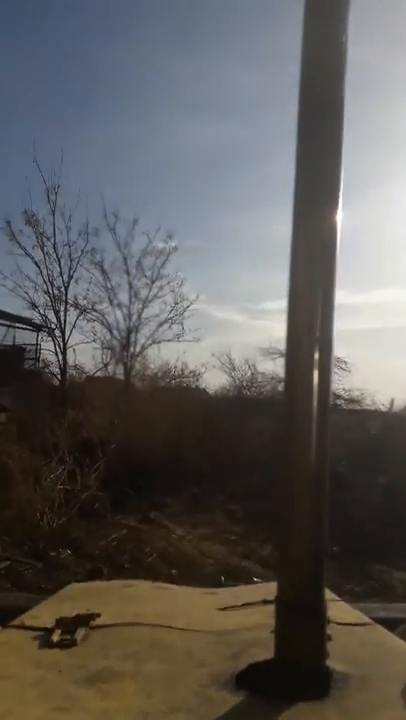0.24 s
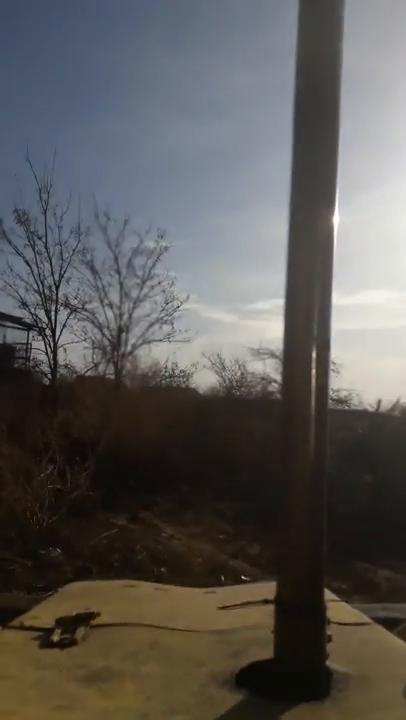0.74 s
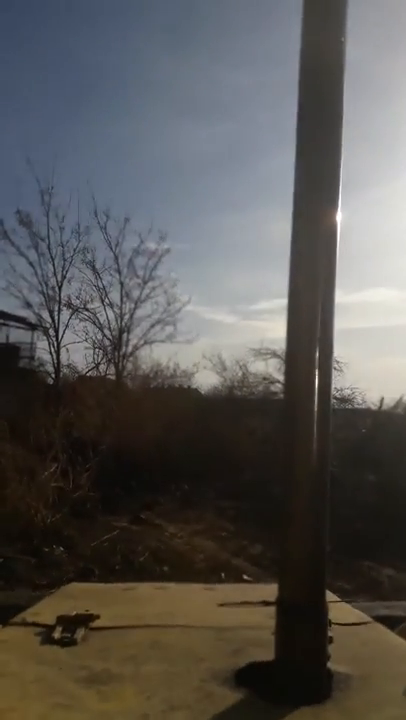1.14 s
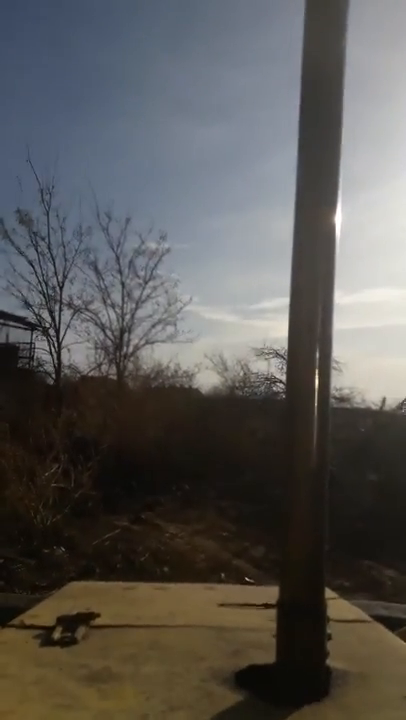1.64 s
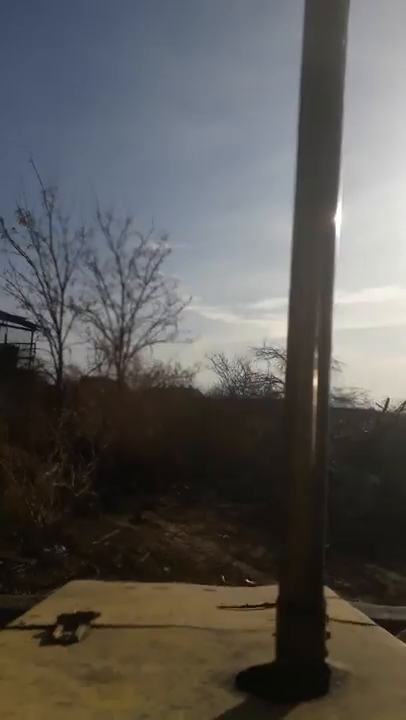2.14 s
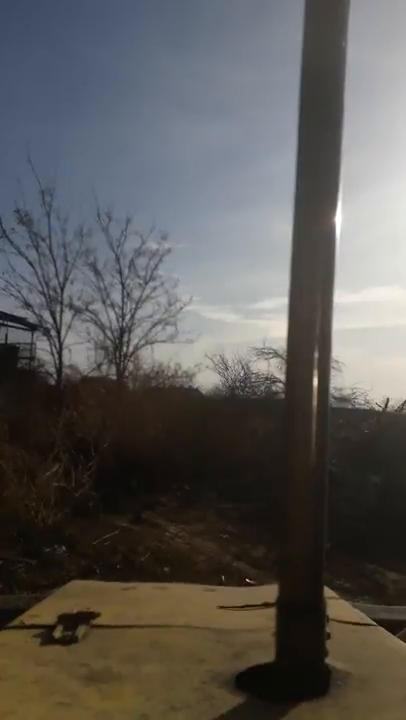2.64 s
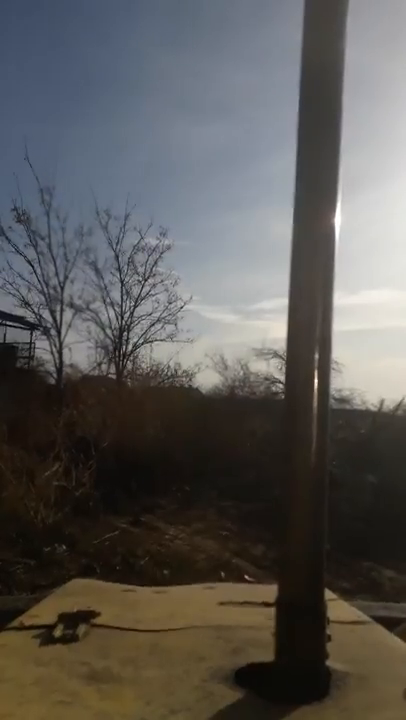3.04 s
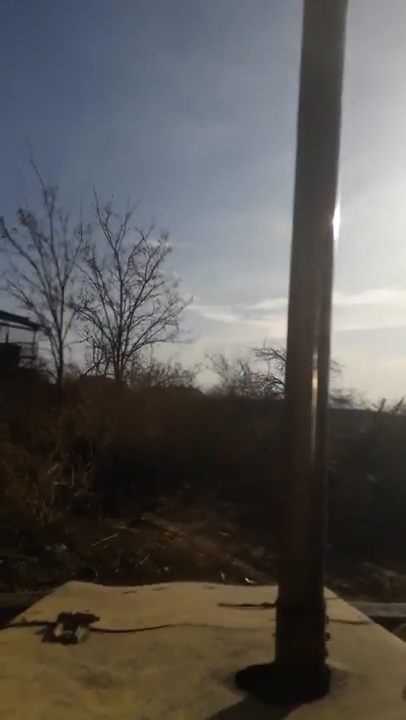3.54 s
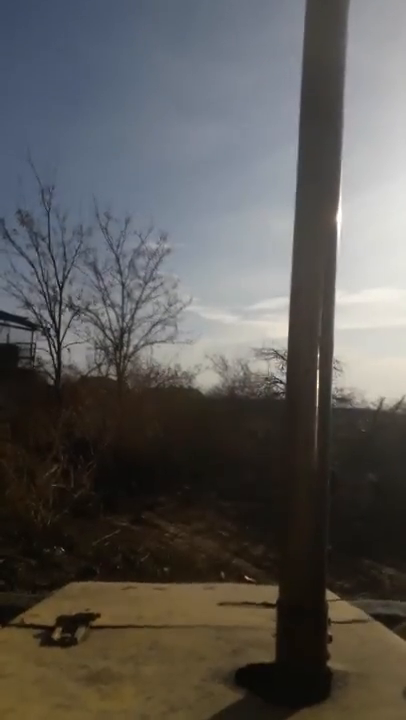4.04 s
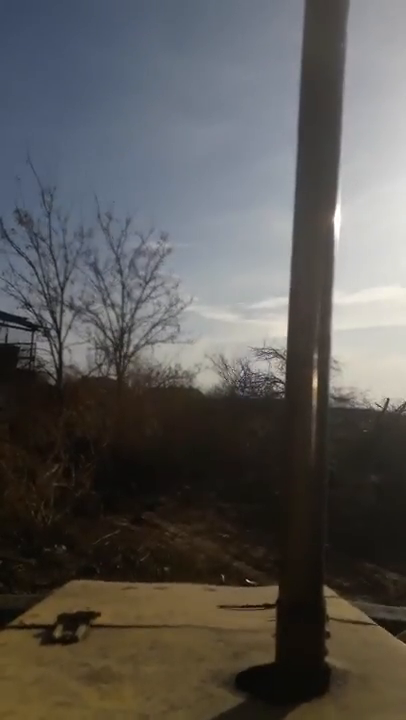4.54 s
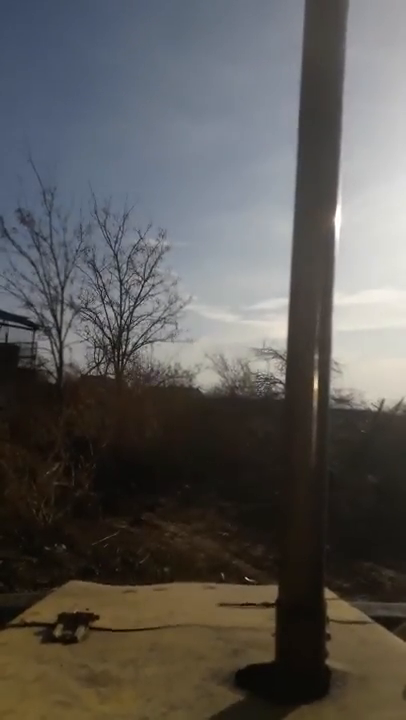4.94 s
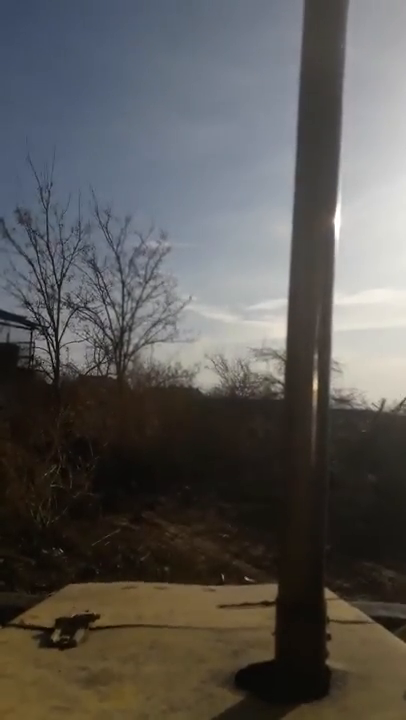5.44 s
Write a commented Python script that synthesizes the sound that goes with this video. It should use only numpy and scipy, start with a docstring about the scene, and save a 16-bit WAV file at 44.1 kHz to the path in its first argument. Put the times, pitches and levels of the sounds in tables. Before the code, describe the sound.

A four-cylinder diesel idles outdoors, heard from just behind the bonnet, throbbing and barking through its tall exhaust stack. A fan hums, loose panels buzz and thump, and a dry pulley squeaks twice at the start. Midway a lever groans, clicks and clanks home in a quick metallic cluster. The whole sound ducks for about a second, then the engine comes back, slightly lower and smoother.

```python
"""Diesel idling under a tall stack

Outdoors, microphone just behind the bonnet. Four cylinders throb, bark and clatter in every cycle;
a fan hums, a dry pulley squeaks and the shaken bodywork buzzes and thumps. A lever groans, clicks
and clanks home, loading the engine, which then runs a little slower and throbs less.
The clanks make the gain control duck for a second."""
import sys
import numpy as np
from scipy import signal
from scipy.fft import rfft, irfft
from scipy.io import wavfile
from scipy.ndimage import uniform_filter1d, minimum_filter1d

SR = 44100
rng = np.random.default_rng(int(sys.argv[2]) if len(sys.argv) > 2 else 0)


def unload_wav(signal):
    """Save mono or channel-first audio to the path in sys.argv[1] as 16-bit WAV at rate SR, clipped to [-1, 1]."""
    wavfile.write(
        sys.argv[1],
        SR,
        np.round(np.clip(np.atleast_2d(signal).T, -1, 1) * 32767).astype(np.int16),
    )


N = 250488
T = np.arange(N) / SR
LOAD_SPAN_S = (3.1, 3.4)  # the lever brings the load on between these times
FIRING_HZ = (23.929, 23.80)  # free, loaded
START_DB, STEADY_DB = -1, 1.9  # the engine's effort at first and once it has come up

# the cylinders in firing order: (rumble [dB], bark [dB], clatter [dB])
CYLINDERS = [(0.5, 6.5, 1), (-1.5, -2.5, -1), (-12.5, -7, 0), (-1.5, 5.5, -2)]
# exhaust stack resonances: (centre [Hz], width [Hz], free level [dB], loaded level [dB])
STACK_RESONANCES = [(71.8, 11, -24, -24.2), (119.3, 6, -42, -35), (152, 27, -26.8, -26)]
# body resonances that swell once a cycle:
# (centre [Hz], width [Hz], lag after the strongest firing [cycles], free level [dB], loaded level [dB])
BODY_THROBS = [(97.87, 10.3, 0.023, -22, -28.5), (188, 13, 0.062, -30.5, -48),
               (270.8, 15, 0.94, -32.5, -33.5)]
# pipe tones: (pitch [Hz], first swell [cycles], free level [dB], loaded level [dB], each cylinder [dB])
PIPE_HUMS = [(185, 0.93, -29.5, -36, (-1.2, 0.094, 0.5, -0.5)), (239, 0.0085, -29, -23, (2.5, -1, -7.5, 1)),
             (525, 0.017, -33, -28.5, (-2.5, -1.5, -5, 4.5))]
# spectrum of the shaken bodywork: (frequency [Hz], level [dB])
RUMBLE_COLOUR = [(25, -42), (60, -18.5), (85, -17.5), (104, 1.5), (150, -17.5), (195, -2), (250, -5.5),
                 (310, -6.5), (370, -8.5), (400, -11), (440, -4.5), (480, -8), (535, -3), (600, -14.5),
                 (900, -34.5), (2000, -54)]
# spectrum of the exhaust bark: (frequency [Hz], level [dB])
BARK_COLOUR = [(200, 1.5), (500, 1), (720, 2), (850, 1.5), (958, 4.5), (1060, 2), (1250, -4.5), (1400, -4),
               (1700, -18), (3000, -27.5), (8000, -44.5)]
# spectrum of injectors and valves: (frequency [Hz], level [dB])
CLATTER_COLOUR = [(500, -9), (1300, 9.5), (2100, 6), (3000, -0.5), (4100, -4), (5300, -10.5), (6000, -12.5),
                  (7200, -19), (9500, -27), (11500, -13.5), (15500, -23)]
# spectrum of the loose valve: (frequency [Hz], level [dB])
TAPPET_COLOUR = [(1500, -41.5), (3000, 3.5), (3500, -6), (3910, 6.5), (4500, -4.5), (5260, -0.5),
                 (5800, -14.5), (7200, -12.5), (9000, -27.5)]
# the lever's knocks: (time [s], snap [dB], crack [dB], boom [dB], position [0 catch to 1 end stop])
LEVER_KNOCKS = [(2.835, -22.5, -19, -29, 0.77), (3.069, -31, -9, -16, 0.015),
                (3.0734, -26.5, -11, -5.5, 0.16), (3.114, -31, -17.5, -7, 0.44),
                (3.145, -31, -23.5, -21, 0.25), (3.178, -27, -25, -28, 0.92), (3.1856, -12, -8.5, -9, 0.66),
                (3.193, -21.5, -4.5, -5, 0.76), (3.253, -30, -13, -8.5, 0.45),
                (3.303, -48, -31.5, -11, 0.34), (3.858, -31, -36, -48, 0.65), (3.878, -27, -25, -31, 0.73),
                (3.986, -32, -31, -23, .5), (5.225, -31.5, -27, -17, 0.72)]
# ring of lever and linkage: (pitch [Hz], level at the catch [dB], level at the end stop [dB], t60 [s])
LEVER_MODES = [(346.6, -5.5, -7, 0.53), (382, -2, -4, 0.36), (904, 5.5, -8.5, 0.24), (1200, -2, -1.5, 0.14),
               (1230, 11, -6.5, 0.039), (1294, -3, -11.5, 0.23), (1360, -12.5, -8, 0.16),
               (2020, -13.5, -13.5, 0.14), (2050, -3, 0.5, 0.04), (2283, -7, -8.5, 0.15),
               (2637, -16, 0.5, 0.09), (2840, -16, 0, 0.085), (3360, -22, -1, 0.07),
               (4296, -17.5, -14.5, 0.12), (4700, -1.5, -23, 0.089), (4890, -14, -5.5, .065),
               (5134, -12.5, -14.5, 0.11), (5420, -18, -9, .08), (5850, -14, -20, 0.1),
               (6270, -21.5, -11.5, 0.11)]
# ring of the catch, freed by the first knock: (pitch [Hz], level [dB], t60 [s])
CATCH_MODES = [(1972, -28.5, 0.33), (2520, -34, .2), (3410, -29, 0.17), (8300, -37, .19)]
# spectrum of steel on steel: (frequency [Hz], level at the catch [dB], level at the end stop [dB])
CRACK_COLOUR = [(300, -10.5, -10), (800, -0.5, -4), (1200, 4, 0.5), (1700, 0.5, 0.5), (2200, 0.5, 2.5),
                (2900, -8, 1), (3500, -12.5, -2.5), (3900, -6.5, -7), (4700, -7, -5.5), (5530, -13, -7),
                (6500, -18, -11.5), (9200, -18.5, -14.5), (12500, -16.5, -14), (15500, -27.5, -23.5)]
# spectrum of the panels around the lever: (frequency [Hz], level [dB])
BOOM_COLOUR = [(40, -34), (100, -22), (170, -6.5), (250, -3.5), (380, -3), (500, -4.5), (650, -11),
               (950, -12), (1400, -15.5), (2500, -30), (8000, -50)]
# spectrum of the rubbing linkage: (frequency [Hz], level [dB])
GROAN_COLOUR = [(150, -24), (280, 3.5), (360, 10), (470, -4), (620, -4.5), (780, -4), (1000, -22.5),
                (2000, -30.5), (6000, -45)]
# dull jolts of the bodywork: (time [s], level [dB])
BODY_THUDS = [(1.623, -9.5), (2.544, -18.5), (2.679, -16), (2.787, -11), (4.574, -18)]
# spectrum of a jolt: (frequency [Hz], level [dB])
THUD_COLOUR = [(100, -20), (250, -1.5), (430, -1), (600, -6.5), (780, -10), (1100, -17.5), (1600, -24.5),
               (4000, -45)]
# thumping panels: (time [s], pitch [Hz], level [dB])
PANEL_THUMPS = [(0.407, 186, -5.5), (0.785, 250, -8.5), (1.029, 183, -3), (1.47, 256, -5), (1.626, 428, 0),
                (1.634, 750, -14), (1.627, 252, -3.5), (2.174, 172, -12), (2.174, 256, -13),
                (2.686, 368, 0), (2.792, 353, -5), (3.04, 185, -9.5), (3.081, 384, 3), (3.13, 254, -5),
                (3.205, 264, 6.5), (3.297, 380, -1), (4.577, 235, 0), (4.687, 92.3, -6.5),
                (5.227, 237, -1.5)]
# small loose parts: (time [s], pitch [Hz], level [dB])
PART_CLINKS = [(.057, 8060, -29), (0.312, 4580, -37), (1.222, 7620, -39), (5.225, 3140, -19.5)]
# buzzing panels and brackets:
# (pitch [Hz], centre [cycles], half length [cycles], free level [dB], loaded level [dB])
PANEL_BUZZES = [(252.2, 0.06, 0.042, -29.5, -34), (251.7, .77, .06, -31.5, -33),
                (444, .55, 0.06, -39.5, -44), (535, 0.793, 0.08, -35, -36), (761, 0.13, 0.45, -41.5, -43.5),
                (888, 0.67, 0.063, -49, -55), (963, .92, 0.13, -54.5, -48.5),
                (1175, 0.035, 0.075, -48, -48)]
# the dry pulley: (time [s], length [s], level [dB])
PULLEY_SQUEAKS = [(0.272, .115, -28), (0.448, .1, -30.5)]


def drone(cycles, strongest_at=0.0564, order_limit=92):
    """Even firings hum through the stack; the strongest one makes the body throb once a cycle."""
    out = np.zeros(N)
    cycle_hz = FIRING_HZ[0] / len(CYLINDERS)
    turns = cycles - strongest_at
    for order in np.arange(len(CYLINDERS), order_limit, len(CYLINDERS)):
        gains = sum(amp(db) / (1 + (2 * (order * cycle_hz - hz) / width) ** 2)
                    for hz, width, *db in STACK_RESONANCES)
        out += under_load(*gains) * harmonic(turns, order)
    for hz, width, lag, free_db, loaded_db in BODY_THROBS:
        orders = round(hz / cycle_hz) + np.arange(-2, 3)  # five neighbours beat once a cycle
        gains = np.exp(-2 * ((orders * cycle_hz - hz) / width) ** 2)
        throb = sum(gain * harmonic(turns - lag, order) for order, gain in zip(orders, gains))
        out += amp(under_load(free_db, loaded_db) + effort_db()) * unit(throb)
    return out


def combustion(cycles, grit_db=2.0):
    """Every firing shakes the bodywork, barks roughly from the stack and rattles injectors and valves."""
    rumble_db, bark_db, clatter_db = np.transpose(CYLINDERS)
    rumble = cycling_noise(cycles, repeat=0.16)
    rumble *= strokes(cycles, rumble_db, lead=0.26, rise=1.0, fall=0.24, floor=0.47, uneven_db=6.5)
    bark = cycling_noise(cycles, repeat=0.69)
    bark *= strokes(cycles, bark_db, lead=0.24, rise=0.57, fall=0.48, floor=0.26, uneven_db=2.0)
    bark *= amp(grit_db * wander(80))
    clatter = cycling_noise(cycles, repeat=0.41)
    clatter *= strokes(cycles, clatter_db, lead=0.31, rise=0.021, fall=0.49, floor=0.97, uneven_db=3.0)
    return amp(effort_db()) * (amp(under_load(-22, -22.5)) * colour(rumble, RUMBLE_COLOUR)
                               + amp(-30.5) * colour(bark, BARK_COLOUR)
                               + amp(under_load(-40.5, -41.0)) * colour(clatter, CLATTER_COLOUR))


def pipe_hums(cycles, pump=0.47):
    """Pipe tones stay locked to the engine and swell with each firing, more for the strong cylinders."""
    out, count = np.zeros(N), len(CYLINDERS)
    for hz, first_swell, free_db, loaded_db, cylinder_db in PIPE_HUMS:
        firings = count * (cycles - first_swell)
        strength = amp(np.interp(firings, np.arange(count), cylinder_db, period=count))
        swell = unit(strength * (1 + pump * np.cos(2 * np.pi * firings)))
        order = round(hz * count / FIRING_HZ[0])
        out += amp(under_load(free_db, loaded_db)) * swell * harmonic(cycles, order)
    return amp(effort_db() - STEADY_DB) * out


def lever_knocks(ring_db=-4.0, snap_t60=0.049, crack_t60=0.1, crack_rise_s=0.0049):
    """Steel meets steel with an instant snap, a crack and the lever's ring; the panels boom after it."""
    out, t = np.zeros(N), np.arange(SR) / SR
    add(out, LEVER_KNOCKS[0][0], sum(mode(hz, db, t60) for hz, db, t60 in CATCH_MODES))
    for s, snap_db, crack_db, boom_db, position in LEVER_KNOCKS:
        spectrum = [(hz, np.interp(position, (0, 1), db)) for hz, *db in CRACK_COLOUR]
        crack = colour(rng.standard_normal(SR), spectrum) * decay(t, crack_t60)
        ring = sum(mode(hz, np.interp(position, (0, 1), db), t60) for hz, *db, t60 in LEVER_MODES)
        add(out, s, panel_boom(boom_db))
        add(out, s, amp(snap_db) * rng.standard_normal(SR) * decay(t, snap_t60))
        add(out, s, amp(crack_db) * (crack + amp(ring_db) * ring) * onset(t, crack_rise_s))
    return out


def panel_boom(db, rise_s=0.01, doubling_db=9, split_hz=430, treble_t60_share=0.59):
    """The harder the knock, the longer the panels ring; their treble dies sooner than their bass."""
    t = np.arange(SR) / SR
    panels = colour(rng.standard_normal(SR), BOOM_COLOUR)
    bass = signal.sosfiltfilt(signal.butter(2, split_hz, fs=SR, output="sos"), panels)
    fade = decay(t, t60=2 ** (db / doubling_db))  # 1 s at 0 dB
    boom = bass * fade + (panels - bass) * fade ** (1 / treble_t60_share)
    return amp(db) * boom * onset(t, rise_s)


def linkage_groan(start_s=2.45, rise_s=0.12, hold_s=0.26, fade_db_per_s=113.5, db=-20):
    """The linkage rubs with a dull, rough sound as the lever is eased over."""
    swell = np.clip((T - start_s) / rise_s, 0, 1) ** 2
    fade_db = fade_db_per_s * np.maximum(T - start_s - rise_s - hold_s, 0)
    return swell * amp(db - fade_db) * colour(rng.standard_normal(N), GROAN_COLOUR)


def loose_parts(thump_periods=16.2):
    """Close to the microphone the shaken bodywork thuds, panels thump and small parts clink."""
    out, t = np.zeros(N), np.arange(SR) / SR
    jolt = onset(t, rise=0.0099) * decay(t, t60=0.13)
    for s, db in BODY_THUDS:
        add(out, s, amp(db) * jolt * colour(rng.standard_normal(SR), THUD_COLOUR))
    for s, hz, db in PANEL_THUMPS:
        add(out, s, mode(hz, db, t60=thump_periods / hz))
    for s, hz, db in PART_CLINKS:
        add(out, s, mode(hz, db, t60=0.045) * onset(t, rise=0.0011))
    return out


def fan(cycles, blade_hz=(367.7, 364.7), slip_hz=1.44, base_db=-27, waver_db=-0.36, surge_at=0.51):
    """The blade tone flutters in gusty air, shakes with every firing and surges with every cycle."""
    flutter = 0.38 * (wander(11) + 1j * wander(11))
    shake = 0.13 * np.cos(2 * np.pi * len(CYLINDERS) * cycles)
    surge = 0.15 * np.cos(2 * np.pi * (cycles - surge_at))
    level = amp(base_db + effort_db() + waver_db * wander(4.8))
    hz = under_load(*blade_hz) + slip_hz * wander(1.4)  # the belt slips, so the pitch drifts
    tone = ((1 + flutter) * np.exp(2j * np.pi * np.cumsum(hz) / SR)).real
    return np.sqrt(2) * level * (1 + shake + surge) * tone


def panel_buzzes(cycles, uneven_db=1.0, detune=0.00897, rough_rad=0.21, follow_effort=1.3):
    """Each loose panel buzzes once a cycle, never twice with quite the same strength or pitch."""
    out = np.zeros(N)
    for hz, centre, half_length, free_db, loaded_db in PANEL_BUZZES:
        turn = np.round(cycles - centre)
        offset = cycles - centre - turn
        strength, pitch = rng.standard_normal(size=(64, 2))[turn.astype(int)].T
        window = np.exp(-0.5 * (offset / half_length) ** 2) * np.cos(np.pi * offset)
        swell = amp(uneven_db * np.tanh(strength)) * window
        phase = 2 * np.pi * np.cumsum(hz * (1 + detune * pitch)) / SR
        tone = np.cos(phase + rough_rad * wander(42))
        out += amp(under_load(free_db, loaded_db)) * unit(swell * tone)
    return amp(STEADY_DB + follow_effort * (effort_db() - STEADY_DB)) * out


def pulley_squeaks(hz=968, slip_rad=0.4):
    """A dry pulley squeaks briefly on one note."""
    swell = sum(amp(db) * np.sqrt(np.sin(np.pi * np.clip((T - s) / length, 0, 1)) + 1e-12)
                for s, length, db in PULLEY_SQUEAKS)
    return swell * np.cos(2 * np.pi * hz * T + slip_rad * wander(25))


def tappet(cycles, lead=0.14, rise=0.037, fall=0.04, uneven_db=1.6, base_db=-57):
    """Faint under the engine, one loose valve ticks once a cycle, each time a little differently."""
    count, age = np.divmod(cycles + lead, 1)
    strength = amp(uneven_db * rng.uniform(-1, 1, size=64))[count.astype(int)]
    tick = strength * cycling_noise(cycles, repeat=0.4) * onset(age, rise) * np.exp(-age / fall)
    return amp(effort_db() + base_db) * colour(tick, TAPPET_COLOUR)


def strokes(cycles, cylinder_db, lead, rise, fall, floor, uneven_db):
    """One swell per firing over a floor; lead, rise and fall are shares of the firing interval."""
    firings = len(CYLINDERS) * cycles + lead
    count, age = np.floor(firings).astype(int), firings % 1
    chance = rng.standard_normal(size=256)
    swell = 0
    for back in range(2):  # the last firing still sounds under the new one
        strength = amp(cylinder_db[(count - back) % len(CYLINDERS)] + uneven_db * chance[count - back])
        swell = swell + strength * onset(age + back, rise) * np.exp(-(age + back) / fall)
    return unit(floor + swell)


def cycling_noise(cycles, repeat):
    """Noise of which a share comes back alike in every engine cycle."""
    size = int(N / cycles[-1])
    alike = rng.standard_normal(size)[(cycles % 1 * size).astype(int) % size]
    return np.sqrt(repeat) * alike + np.sqrt(1 - repeat) * rng.standard_normal(N)


def harmonic(turns, order, waver_db=1.5, scatter_order=25, scatter_turns=0.37):
    """One multiple of the engine cycle; reflections scatter and shake the higher ones."""
    scatter = min(order / scatter_order, 1) ** 3
    phase = order * turns + scatter * scatter_turns * rng.uniform(-0.84, 1)
    return np.sqrt(2) * amp(waver_db * scatter * wander(2.9)) * np.cos(2 * np.pi * phase)


def under_load(free, loaded):
    """Glides from the free to the loaded value as the lever goes home."""
    return np.interp(T, LOAD_SPAN_S, (free, loaded))


def effort_db(rise_s=0.71, drift_db=0.5):
    """How hard the engine sounds: it comes up to a steady level and drifts a little."""
    return STEADY_DB + (START_DB - STEADY_DB) * np.exp(-T / rise_s) + drift_db * wander(2.3)


def mode(hz, db, t60):
    """A dying tone that builds up within about one period."""
    t = np.arange(SR) / SR
    return amp(db) * decay(t, t60) * onset(t, 0.5 / hz) * np.sin(2 * np.pi * (hz * t + rng.random()))


def onset(t, rise):
    """Climbs from 0 towards 1 with time constant rise."""
    return 1 - np.exp(-t / rise)


def decay(t, t60):
    """Falls by 60 dB in t60."""
    return np.exp(-np.log(1000) * t / t60)


def wander(rate_hz):
    """Random drift of rms 1, up to about the given rate."""
    size = 2048
    bins = np.fft.rfftfreq(size, T[-1] / size)
    slow = irfft(rfft(rng.standard_normal(size)) / (1 + (bins / rate_hz) ** 4), size)
    return np.interp(T, np.linspace(0, T[-1], size), unit(slow))


def colour(x, points):
    """Gives x a spectrum, at rms 1."""
    hz, db = np.transpose(points)
    bins = np.fft.rfftfreq(len(x), 1 / SR)
    gains = amp(np.interp(np.log(bins + 1), np.log(hz), db))
    return unit(irfft(rfft(x) * gains, len(x)))


def amp(db):
    """Decibels to gain."""
    return 10 ** (np.asarray(db) / 20)


def unit(x):
    """Scales to rms 1."""
    return x / np.sqrt(np.mean(x ** 2) + 1e-20)


def add(mix, s, sound):
    """Mixes a sound in at s seconds."""
    part = mix[round(s * SR):][:len(sound)]
    part += sound[:len(part)]


def scene(hunt=0.0012, start_turn=0.017):
    """From just behind the bonnet: the engine on one shared cycle, with pulley, lever and loose parts."""
    firing_hz = under_load(*FIRING_HZ) * (1 + hunt * wander(2))  # the governor hunts
    cycles = start_turn + np.cumsum(firing_hz) / SR / len(CYLINDERS)
    engine = drone(cycles) + pipe_hums(cycles) + combustion(cycles)
    engine += tappet(cycles) + panel_buzzes(cycles) + fan(cycles)
    return (engine + pulley_squeaks() + linkage_groan() + lever_knocks() + loose_parts())[None]


def gain_control(x, threshold_db=-8.5, knee_db=4, depth_db=14.0,
                 attack_s=0.24, hold_s=1.054, recover_db_per_s=42):
    """A sound over the threshold makes the gain sink; it stays down for a while, then recovers."""
    power_db = 10 * np.log10(abs(uniform_filter1d(x ** 2, size=2200)) + 1e-12)
    cut_db = depth_db * np.clip((power_db - threshold_db) / knee_db, 0, 1)
    size = int(hold_s * SR) // 2 * 2 + 1
    held_db = -minimum_filter1d(-cut_db, size, origin=size // 2, mode="constant")
    pole = np.exp(-1 / (attack_s * SR))
    sunk_db = np.minimum(held_db, signal.lfilter([1 - pole], [1, -pole], held_db))
    recovery_db = recover_db_per_s * T
    return x * amp(recovery_db - np.maximum.accumulate(sunk_db + recovery_db))


def record(dry, ceiling=0.96, mic_edge_hz=7430, leak_db=-22, cut_hz=15800):
    """One microphone, dull above its edge, with gain control, soft overload and a band limit."""
    x = gain_control(dry[0]) * signal.windows.tukey(N, 0.0006)
    x = x / (1 + (x / ceiling) ** 8) ** (1 / 8)
    hz = np.fft.rfftfreq(N, 1 / SR)
    mic = np.sqrt(1 / (1 + (hz / mic_edge_hz) ** 44) + amp(leak_db) ** 2 * (hz > mic_edge_hz))
    x = irfft(rfft(x) * mic, N)
    band_limit = signal.firwin(511, cut_hz, window=("kaiser", 9), fs=SR)
    return signal.oaconvolve(x, band_limit, "same")[None]


dry = scene()
out = record(dry)
unload_wav(out)
```